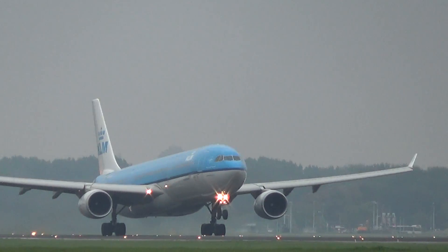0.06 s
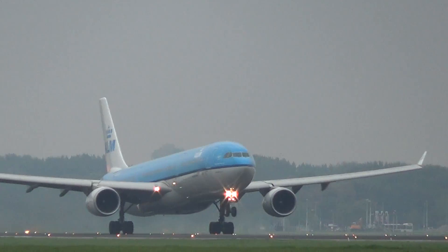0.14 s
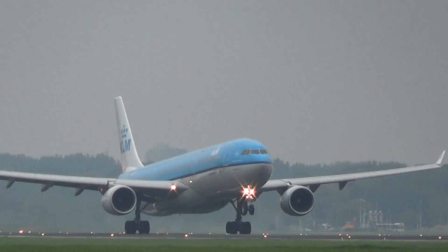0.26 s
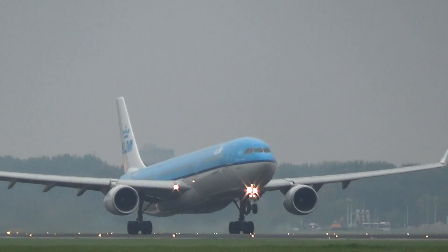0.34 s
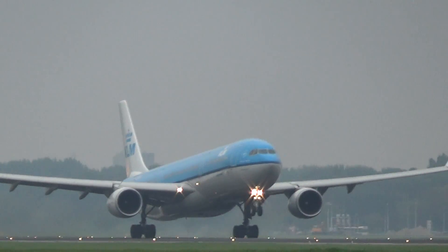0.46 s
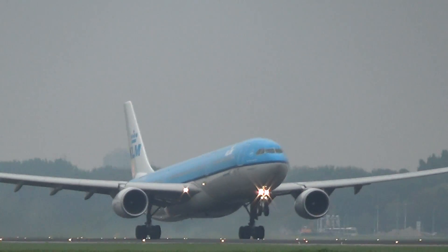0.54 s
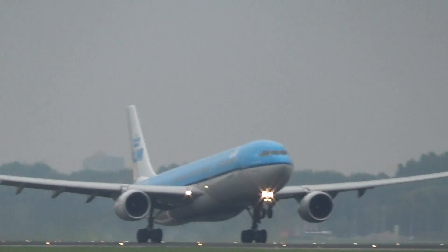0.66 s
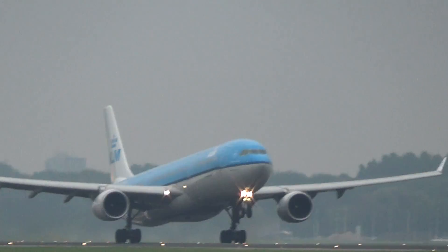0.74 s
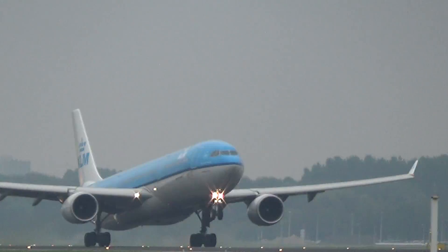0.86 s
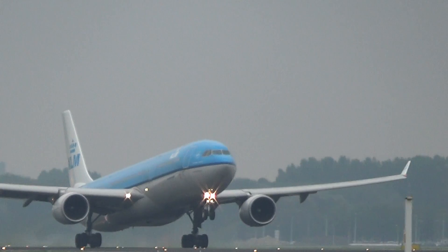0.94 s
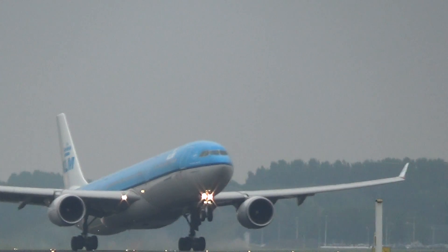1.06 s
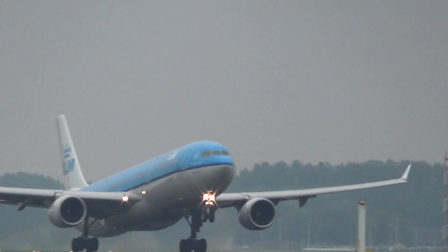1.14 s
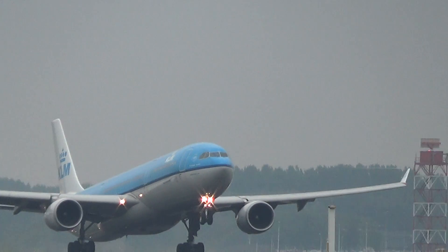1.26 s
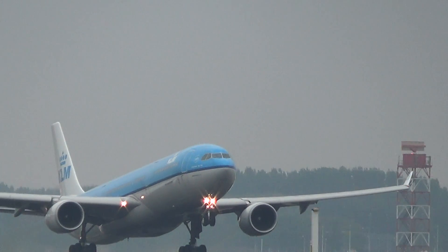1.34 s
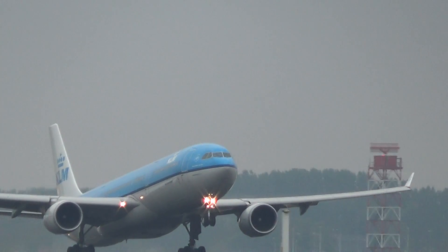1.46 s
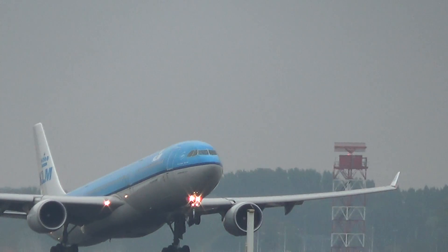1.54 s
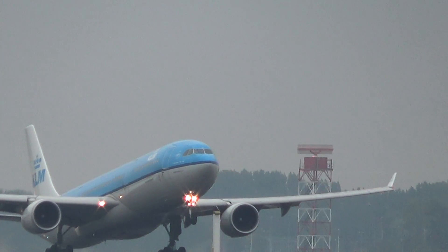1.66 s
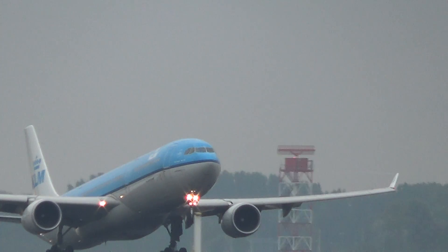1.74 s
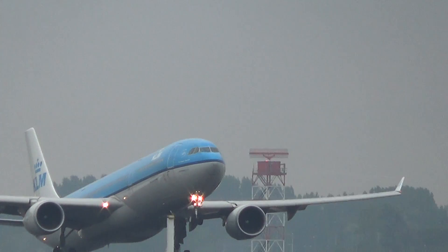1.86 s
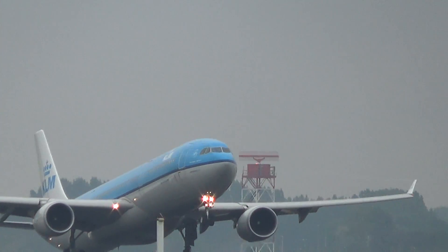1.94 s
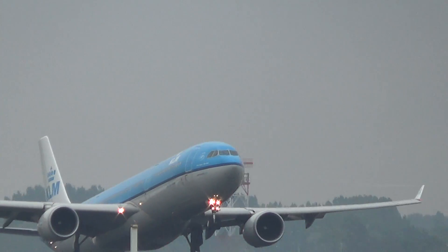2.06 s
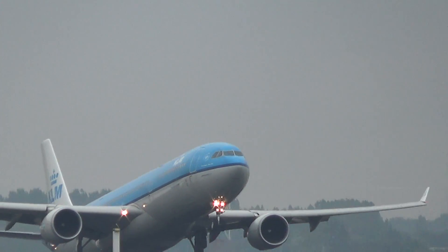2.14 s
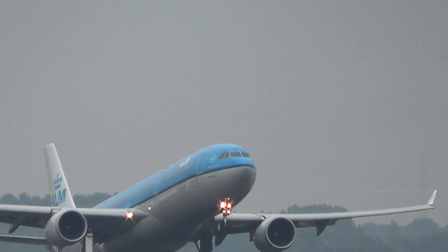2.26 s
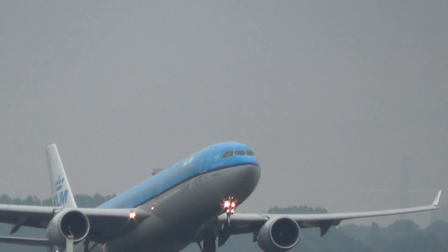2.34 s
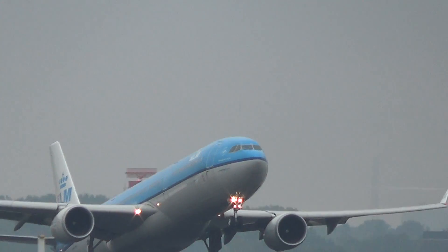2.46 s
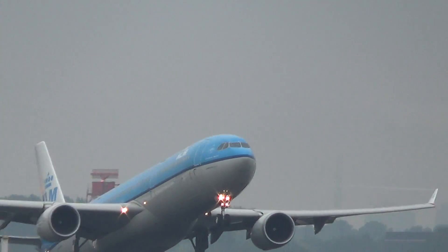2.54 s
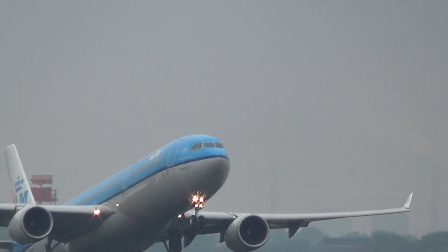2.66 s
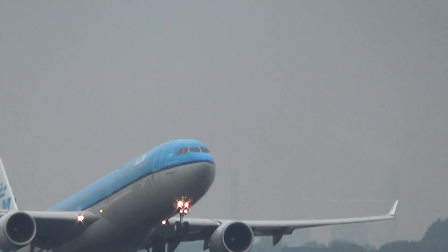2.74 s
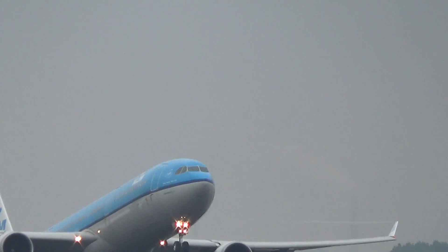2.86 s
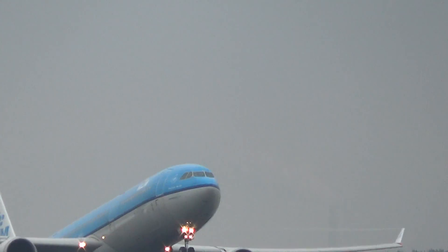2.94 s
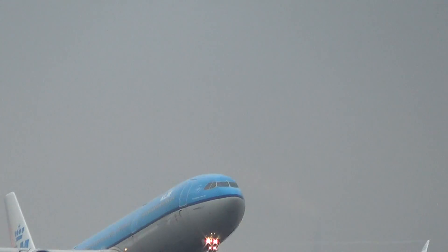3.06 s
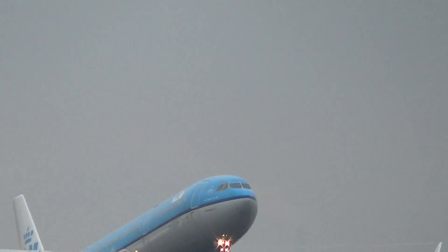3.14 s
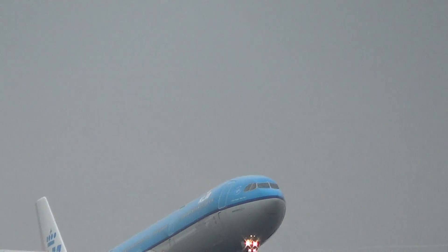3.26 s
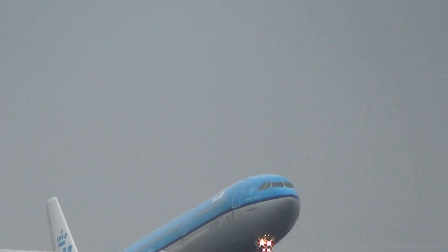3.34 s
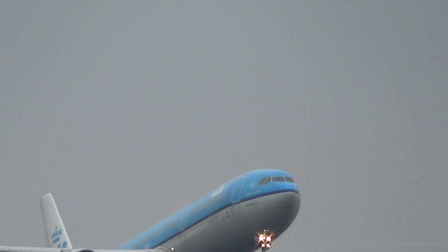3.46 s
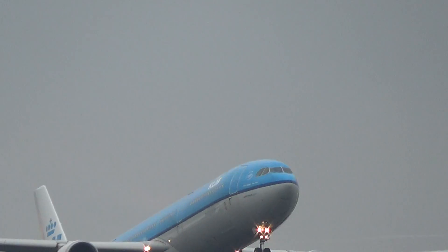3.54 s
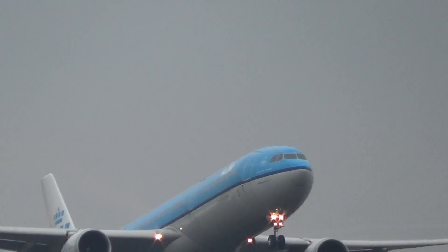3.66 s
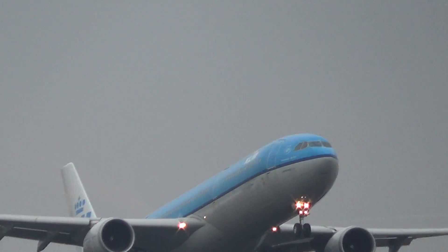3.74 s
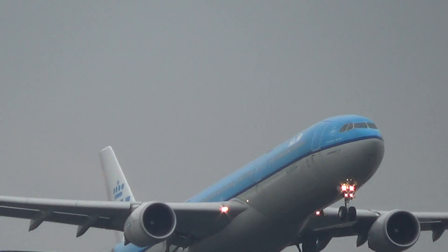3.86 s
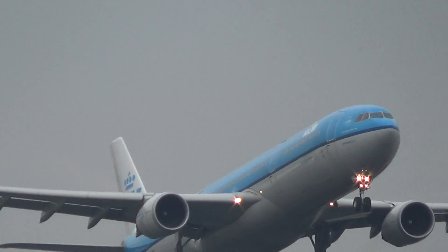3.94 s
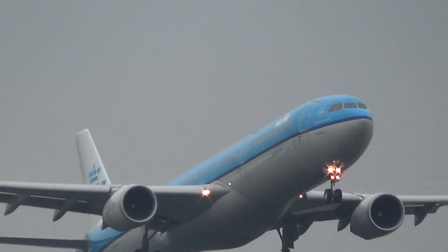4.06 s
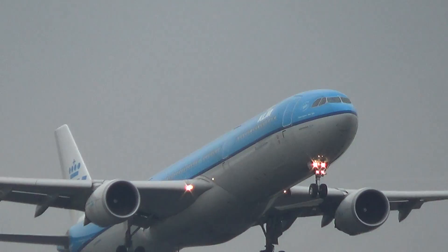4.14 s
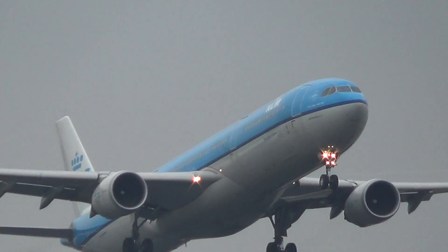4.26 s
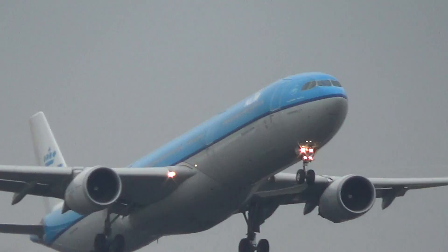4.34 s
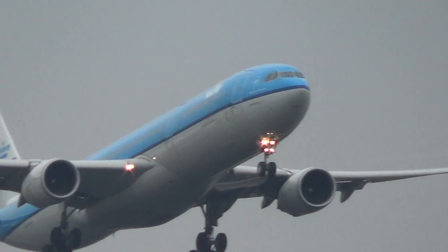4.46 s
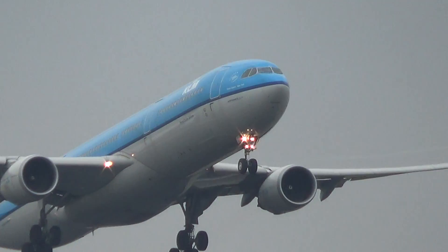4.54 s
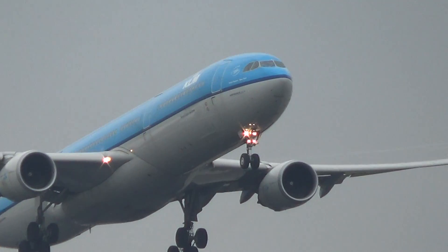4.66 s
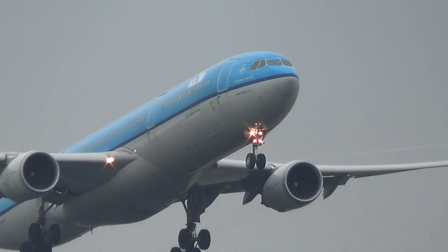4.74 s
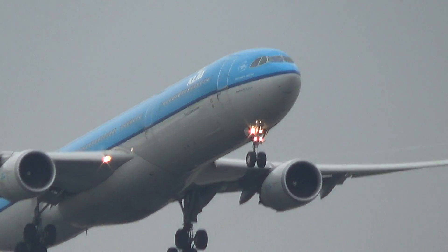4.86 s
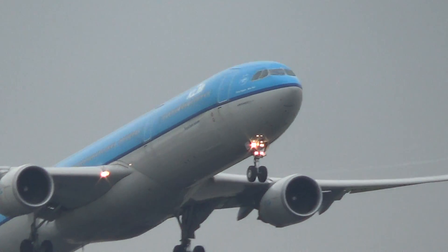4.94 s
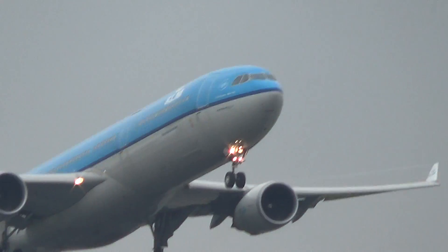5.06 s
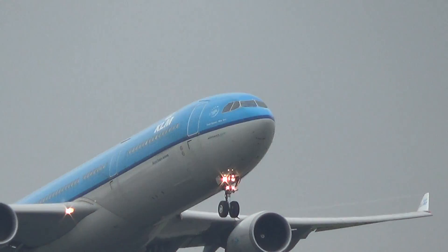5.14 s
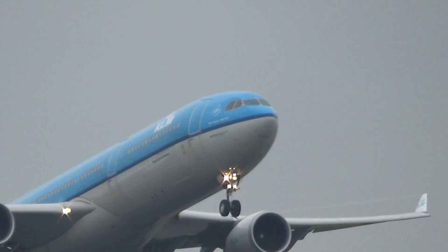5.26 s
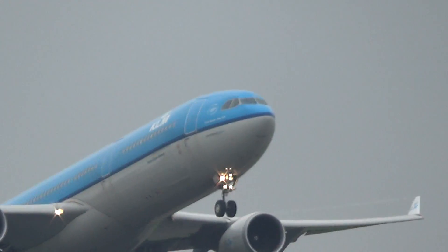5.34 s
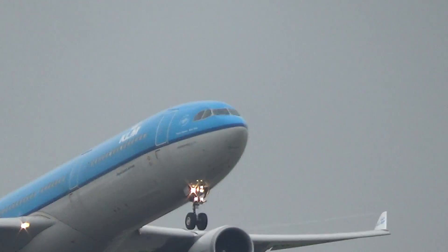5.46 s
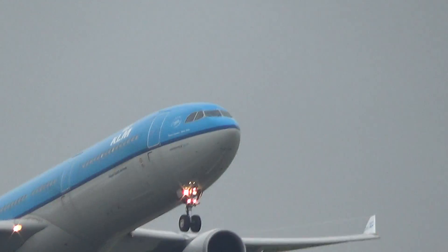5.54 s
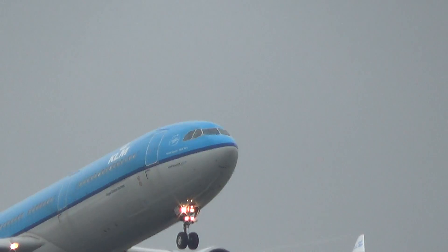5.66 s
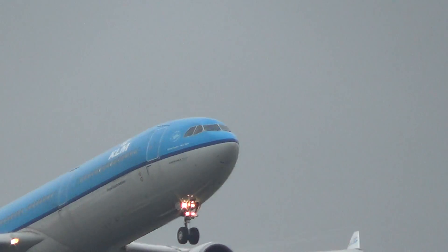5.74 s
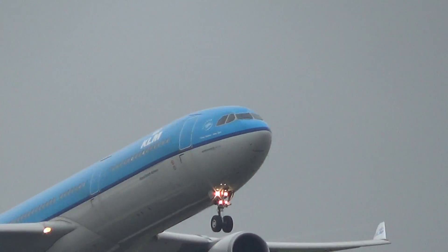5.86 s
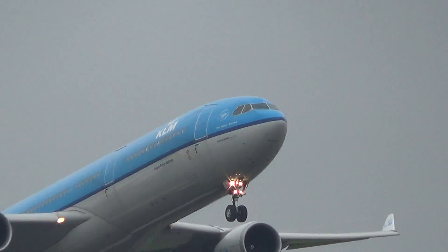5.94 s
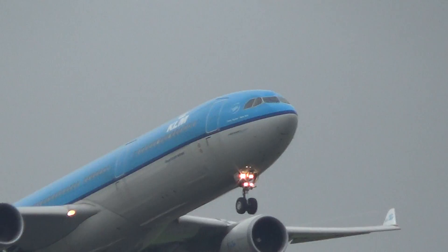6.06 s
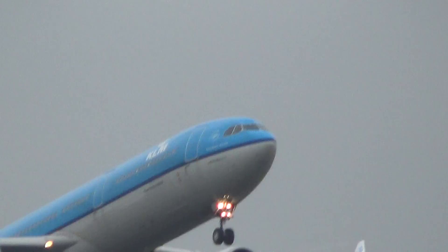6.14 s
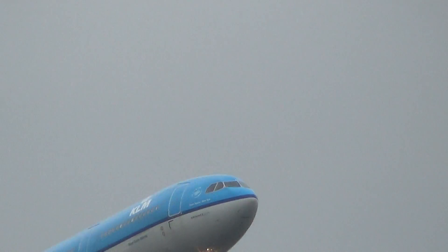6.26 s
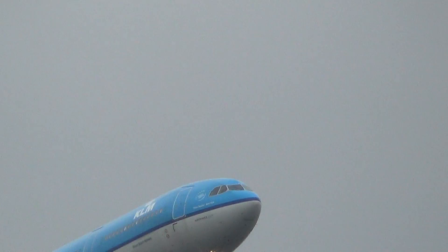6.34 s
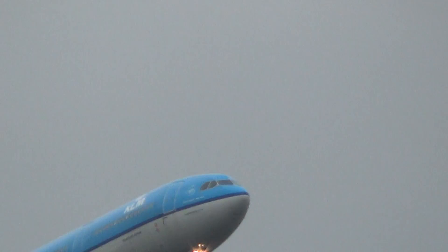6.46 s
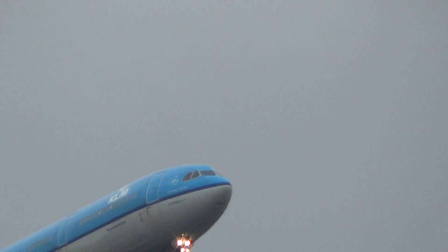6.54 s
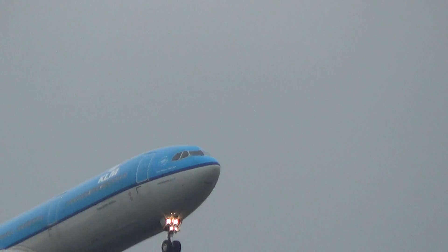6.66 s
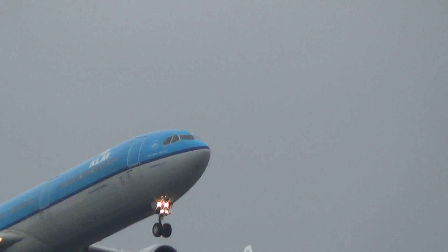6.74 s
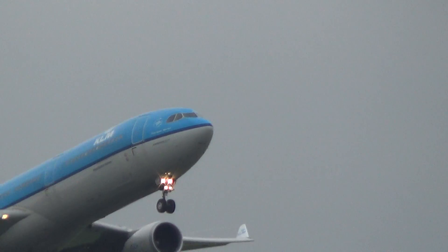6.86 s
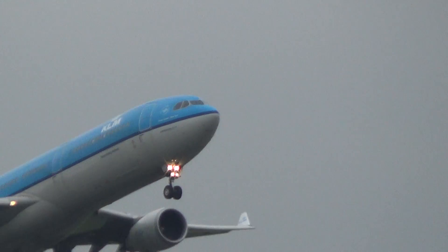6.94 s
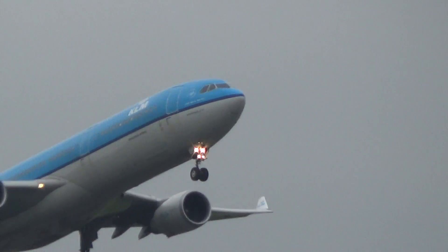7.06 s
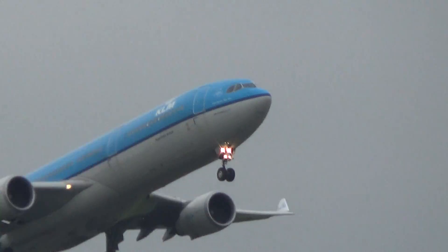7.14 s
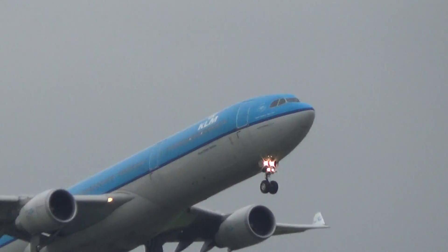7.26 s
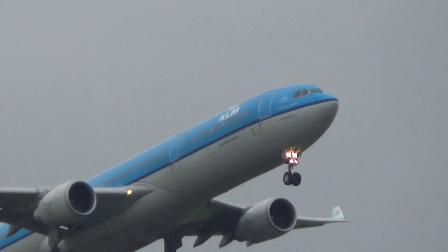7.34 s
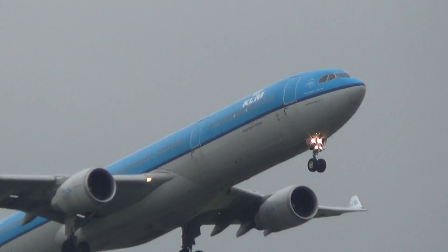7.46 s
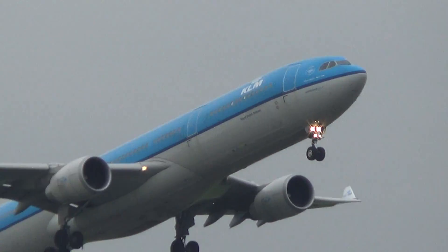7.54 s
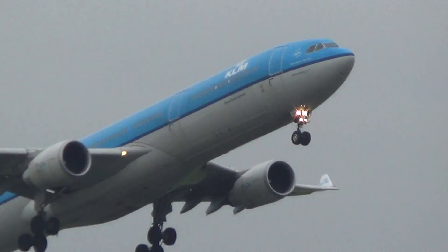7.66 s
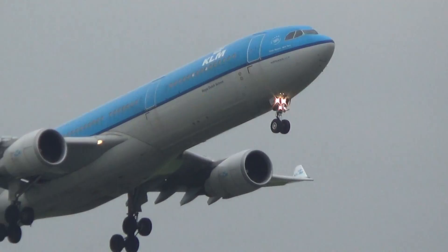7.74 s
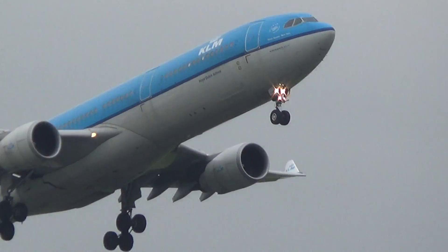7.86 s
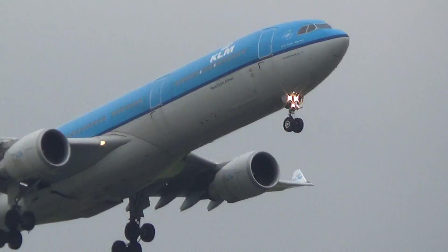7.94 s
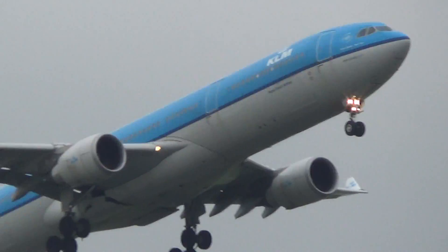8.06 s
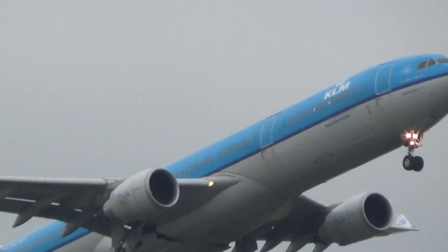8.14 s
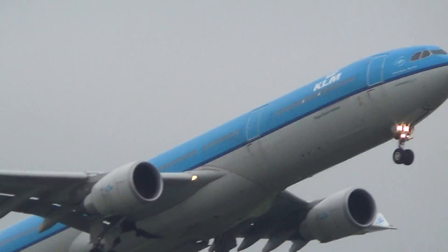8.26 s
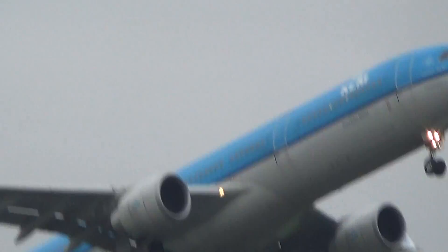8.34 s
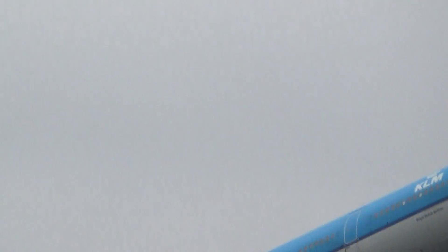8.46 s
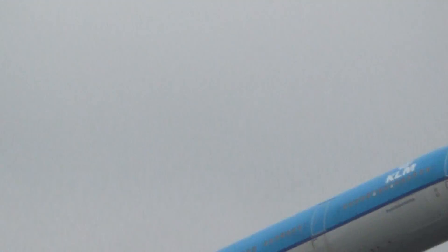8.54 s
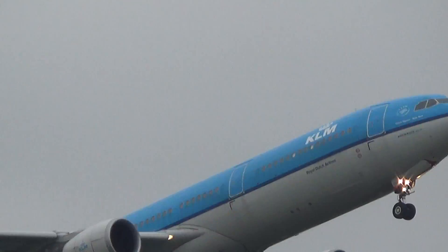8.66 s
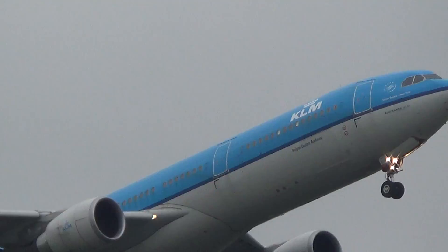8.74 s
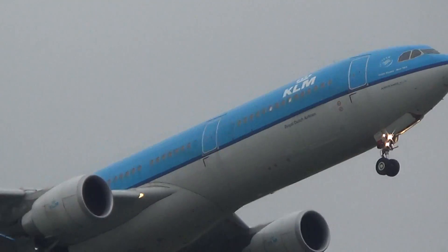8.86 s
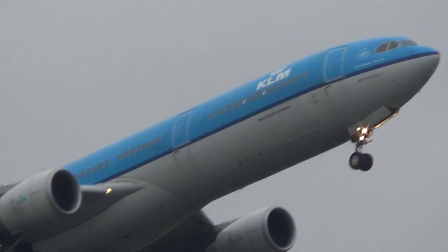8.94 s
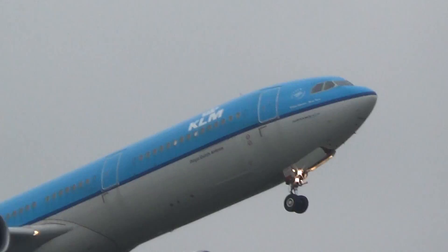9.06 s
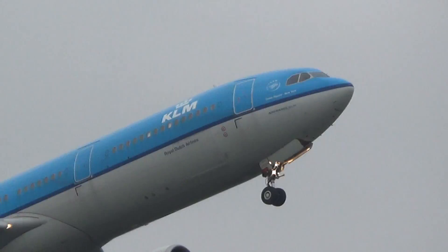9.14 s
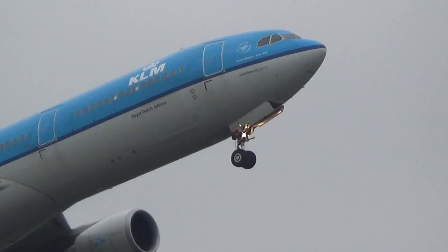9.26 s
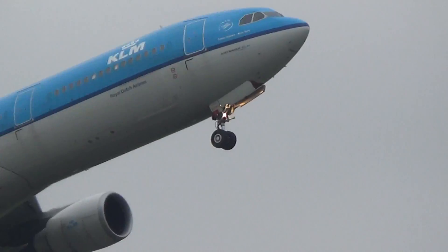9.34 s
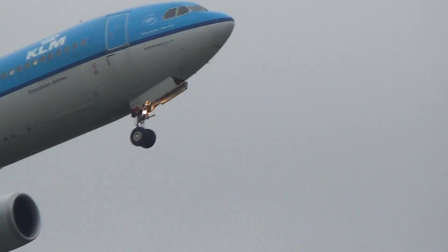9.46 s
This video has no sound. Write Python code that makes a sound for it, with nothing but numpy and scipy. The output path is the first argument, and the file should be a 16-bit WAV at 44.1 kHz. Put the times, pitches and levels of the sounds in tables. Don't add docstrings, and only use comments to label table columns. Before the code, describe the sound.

Breezy airfield with faint jet hiss and gusty microphone rumble, then an approaching airliner's roar swells close, with a piercing fan whine sliding down.

```python
import sys
import numpy as np
from scipy import signal
from scipy.fft import rfft, irfft, next_fast_len
from scipy.io import wavfile

SR = 44100
rng = np.random.default_rng(int(sys.argv[2]) if len(sys.argv) > 2 else 0)


def to_linear_factor(level_db):
    exponent = np.asarray(level_db, float) / 20
    return 10 ** exponent


def dump_mix(stems):
    frames = np.atleast_2d(stems).T
    limited = np.clip(frames, -1, 1)
    pcm = np.round(limited * 32767).astype(np.int16)
    wavfile.write(sys.argv[1], SR, pcm)


N = 418509
SIZE = next_fast_len(N)
HZ = np.maximum(np.arange(SIZE // 2 + 1) * SR / SIZE, 1)
STEP = 16
SLOW_S = np.arange(N // STEP + 2) * STEP / SR

START_M, END_M, NEAR_M = 700, 150, 266
CLOSING_BEND = 1.72
AIR_DB_PER_M = 0.0187


def rms_one(x):
    return x / np.sqrt(np.mean(x ** 2) + 1e-20)


def full(slow):
    return np.interp(np.arange(N) / SR, SLOW_S, slow)


def in_time(rows):
    s, *columns = np.transpose(rows)
    return [np.interp(SLOW_S, s, column) for column in columns]


def at_hz(points, hz):
    table_hz, table_db = np.transpose(points)
    return np.interp(np.log(hz), np.log(table_hz), table_db)


def bumps(rows):
    return sum(db * np.exp(-((SLOW_S - s) / width) ** 2) for s, db, width in rows)


def plateau(start, length, edge):
    inside_s = np.minimum(SLOW_S - start, start + length - SLOW_S)
    return np.clip(inside_s / edge + .5, 0, 1)


def drift(rate):
    r = np.exp(-2 * np.pi * STEP * rate / SR)
    settle = 5000
    chance = rng.standard_normal(len(SLOW_S) + settle)
    return rms_one(signal.lfilter([1], [1, -2 * r, r * r], chance)[settle:])


def noise(colour_db, lo_hz, hi_hz, channels=1):
    gain = to_linear_factor(colour_db)
    between = (HZ > lo_hz) & (HZ < hi_hz)
    gain = gain / np.sqrt(np.sum(gain[between] ** 2) / len(HZ))
    return gain * rfft(rng.standard_normal((channels, SIZE)))


def bands(spectrum, centres):
    place = np.interp(np.log(HZ), np.log(centres), np.arange(len(centres)))
    for k, hz in enumerate(centres):
        share = np.clip(1 - np.abs(place - k), 0, 1)
        yield hz, irfft(spectrum * share, SIZE)[..., :N]


def shimmering(hz, level_db, shimmer, width_hz):
    share, gain = np.clip(shimmer, 0, 1), np.sqrt(2) * to_linear_factor(level_db)
    along = gain * (np.sqrt(1 - share) + np.sqrt(share / 2) * drift(width_hz))
    across = gain * np.sqrt(share / 2) * drift(width_hz)
    phase = 2 * np.pi * np.cumsum(full(hz)) / SR
    return full(along) * np.cos(phase) + full(across) * np.sin(phase)


def beyond_m():
    travelled = (SLOW_S * SR / N) ** CLOSING_BEND
    return START_M - NEAR_M - (START_M - END_M) * travelled


# start_s, level_db
APPROACH = [(0, -40.5), (1.2, -38.5), (2.0, -39.5), (2.8, -38), (4.4, -36), (5.2, -33.5), (6.0, -30),
            (6.4, -29), (6.55, -24), (6.68, -25.5), (7.03, -23.5), (7.3, -18.5), (7.65, -19.5), (7.85, -22),
            (8.0, -18.5), (8.5, -21), (9.0, -19.5), (9.49, -20)]


def approach_db():
    return in_time(APPROACH)[0]


# pitch_hz, width_hz, level_db
IDLING_WHINES = [
    (1775, 40, -59),
    (2080, 15, -62),
]
# start_s, length_s, pitch_hz, rise_hz_per_s, level_db
SHRILL_WHINES = [
    (.1, .4, 3180, 550, -61),
    (2.35, .42, 3200, 0, -56),
]
# pitch_hz, level_db
AIRFIELD_HISS = [(1500, -20), (2800, 0), (4000, -3), (5200, -9), (7000, -13), (11000, -24)]


def far_airfield(hiss_db=-63.5):
    whines = 0
    for hz, width, db in IDLING_WHINES:
        whines = whines + shimmering(np.full(len(SLOW_S), hz), db + 3 * drift(0.73), 0.89, width)
    for s, length, hz, rise, db in SHRILL_WHINES:
        swell_db = db + 3 - 40 * (1 - plateau(s - .1, length + .2, .3))
        whine = shimmering(hz + rise * (SLOW_S - s), swell_db, .8, width_hz=35)
        whines = whines + whine * full(plateau(s - .2, length + .4, .1))
    hiss = irfft(noise(at_hz(AIRFIELD_HISS, HZ), 2800, 5200, channels=2), SIZE)[:, :N]
    return whines * [[.7], [1]] + to_linear_factor(hiss_db) * hiss


# pitch_hz, level_db
PREAMP_HISS = [(300, -30), (1000, 4), (6000, 3), (9000, 1.5), (12000, 0.2), (16000, -1.5)]


def electronics(whistle_db=-63, hiss_db=-68, line_hz=15625, field_hz=50):
    sink_db = -0.26 * np.maximum(approach_db() + 30, 0)
    late = np.maximum(SLOW_S - 8.1, 0)
    whistle_db = whistle_db + sink_db - 11 * late
    hiss_db = hiss_db + 0.55 * sink_db - 4.5 * late
    t = np.arange(N) / SR
    from_gap = np.abs((t - .0112 + .5 / field_hz) % (1 / field_hz) - .5 / field_hz)
    gate = np.clip((from_gap - .0018) / .001, .05, 1)
    whistle = gate * np.sin(2 * np.pi * line_hz * t)
    hiss = irfft(noise(at_hz(PREAMP_HISS, HZ), 13100, 17900)[0], SIZE)[:N]
    return full(to_linear_factor(whistle_db + 4.5)) * whistle + full(to_linear_factor(hiss_db + .8)) * hiss


# start_s, peak_db, top_hz
BODY_TICKS = [(0.0983, -48, 8000), (0.353, -51, 8000), (0.4262, -50, 8000), (0.8068, -53, 8000),
              (3.636, -36.5, 9400), (4.0430, -32.5, 9000), (4.0712, -45, 7000), (5.8230, -45, 9200),
              (6.816, -56, 11900), (6.8494, -54, 8950), (7.579, -48.5, 12000)]


def ticks(decay_s=.0018, body_hz=4400, body_db=-7):
    out, length = np.zeros(N), 600
    t = np.arange(length) / SR
    shell = to_linear_factor(body_db) * np.sin(2 * np.pi * body_hz * t)
    for s, db, top_hz in BODY_TICKS:
        band = signal.butter(2, [3400, top_hz], "band", fs=SR, output="sos")
        crack = signal.sosfilt(band, rng.standard_normal(length))
        start = round(s * SR)
        out[start:start + length] = to_linear_factor(db + 7.5) * np.exp(-t / decay_s) * (crack + shell)
    return out


# start_s, buffet_db, brightness_db_per_octave
WIND = [(0, -35.5, 0.5), (1.2, -31.5, 1.5), (2.35, -30, 0.5), (2.55, -23, -1.5), (2.95, -23, -1.5),
        (3.2, -28, 1), (4.7, -29, 0.5), (5.5, -31, 0), (5.95, -21, -0.5), (6.4, -22, 0.5), (6.95, -21.5, 4),
        (6.97, -27, -1), (7.85, -20.5, 0), (8.2, -26, 1), (8.8, -23.5, 1), (9.49, -32, 4)]
# middle_s, level_db, half_width_s
GUSTS = [(0, 9, 0.02), (.2, -4, 0.03), (.31, 11.5, 0.029), (.52, -3, 0.11), (.67, 7, 0.056),
         (.82, -4, 0.072), (.89, 4.5, .04), (.95, -3, .04), (1.47, 4, .07), (1.73, 2.5, 0.1),
         (1.86, -3, 0.053), (2.24, 4, 0.036), (2.32, -1.5, .05), (2.6, 3.5, 0.038), (2.74, 3.5, 0.036),
         (2.81, -7, 0.025), (3.04, -7.5, 0.051), (3.16, 3.5, .06), (3.76, -1.5, .06), (4.02, 0.5, 0.064),
         (4.63, 4, 0.083), (4.79, -2.5, .05), (4.88, 3.5, 0.042), (5.84, 2.5, 0.031), (5.99, -0.5, 0.018),
         (7.39, -4, 0.055), (8.56, 4.5, 0.041), (8.64, -3.5, 0.033), (9.14, -3.5, .07), (9.27, 6.5, 0.035)]
# pitch_hz, level_db
BUFFET = [(25, -30), (50, -17), (100, -3), (180, 0), (300, -2), (500, -8), (900, -18), (1600, -29),
          (2300, -44), (6000, -100)]
# pitch_hz, level_db
PORT_SIDE = [(60, -15.5), (170, -7), (340, -2.5), (520, 0.5), (1200, -2.6), (3000, 19.5)]


def wind(lumpy_db=1.5, unrelated_db=-9, dulling=0.25):
    mean_db, bright_db = in_time(WIND)
    gust_db = bumps(GUSTS)
    bright_db = bright_db - dulling * gust_db
    one, other = noise(at_hz(BUFFET, HZ), 62, 420, channels=2)
    side = 1j * one + to_linear_factor(unrelated_db) * (1 + 90 / HZ) * other - 9 / HZ * one
    side = side * to_linear_factor(at_hz(PORT_SIDE, HZ))
    lumps_db = mean_db + gust_db - 1.5 + lumpy_db * drift(25.0)
    out = 0
    for hz, part in bands(np.array([one, side]), np.geomspace(100, 1600, 5)):
        octaves = np.log2(hz / 250)
        tilt_db = bright_db * max(octaves, 0.51 * octaves)
        out = out + part * full(to_linear_factor(lumps_db + tilt_db + 0.99 * drift(15.0)))
    return out


# start_s, length_s, level_db
DIPS = [
    (5.96, .1, -2),
    (6.783, .19, -4.5),
]


def dip_db():
    return sum(db * plateau(s, length, 0.013) for s, length, db in DIPS)


def crackle(per_s=60, near_db=-44.5, db_per_m=.045, low_hz=7000, spread_db=3.5):
    born = rng.random(N) < per_s / SR
    sizes = to_linear_factor(spread_db * np.minimum(rng.exponential(1, N), 4)) * rng.choice([-1, 1], N)
    far_m = beyond_m()
    level = full(to_linear_factor(near_db - db_per_m * (2 * np.maximum(far_m, 0) + far_m)))
    highpass = signal.butter(2, low_hz, "high", fs=SR, output="sos")
    return signal.sosfilt(highpass, born * sizes * level + 1e-18)


# start_s, pitch_hz, level_db (against the roar)
FAN = [(0, 2478, -13), (1, 2498, -10.5), (3, 2532, -13.5), (5, 2555, -8.5), (6.9, 2546, -7.5),
       (7.25, 2531, -4), (8.05, 2506, -9), (8.6, 2475, 0), (9.49, 2435, -0.5)]
# multiple_of_pitch, level_db (against the tone)
OVERTONES = [
    (2, -25),
    (3, -47),
]
# start_s, length_s, level_db
ROTOR_BEAMS = [
    (7.1, .2, 14.5),
    (8.5, 1.2, 8.5),
]


def fans(far_shimmer=1.1, near_shimmer=.3, waver_hz=9):
    hz, beam_db = in_time(FAN)
    shimmer = far_shimmer + (near_shimmer - far_shimmer) * plateau(8.5, 10, .3)
    hz = hz + waver_hz * shimmer * drift(4)
    roar_db, farness_db = approach_db(), -AIR_DB_PER_M * beyond_m()
    tone_db = roar_db + beam_db
    out = shimmering(hz, tone_db + 1, .8 * shimmer, width_hz=26)
    out += shimmering(hz - 55, tone_db - 10.5, 1, width_hz=45)
    for k, db in OVERTONES:
        out += shimmering(k * hz, tone_db + db + 1.3 * k * farness_db, 0.91, width_hz=45 * k)
    rotor_hz = 1588 - 25 * SLOW_S
    rotor_db = roar_db - 18.5 + sum(db * plateau(s, length, 0.11) for s, length, db in ROTOR_BEAMS)
    return out + shimmering(rotor_hz, rotor_db + farness_db, .5, width_hz=10)


# pitch_hz, level_db
ROAR = [(35, -56), (60, -27), (141, -14), (250, -27), (314, -16), (724, -3), (1110, -3.5), (2030, -7.5),
        (2670, -10.5), (4880, -23), (6280, -38.5), (8160, -55), (10500, -62), (14000, -94)]
# pitch_hz, width_hz, level_db
HOUSING = [(945.5, 95, -8), (1130, 190, 0), (1355, 113, 0), (2450, 67, 5), (4240, 300, -2.5),
           (5400, 320, -3), (6750, 300, -5.5), (7400, 300, 0)]
# middle_s, level_db, half_width_s
GROUND = [(.8, -1, 0.19), (5.2, -0.5, 0.1), (6.5, -4, 0.17), (7.1, -1, .1), (7.48, -5, 0.22),
          (7.85, 2, 0.076), (8.3, 6, 0.17), (8.9, -3.5, 0.26), (9.4, 3.5, 0.13)]
# middle_s, level_db (at 4 kHz),
# half_width_s
CLEAR_AIR = [(.35, -0.5, 0.11), (.8, -4, 0.18), (2.5, 3, .2), (6.65, 2, 0.11), (7.2, -1, 0.2),
             (7.7, 2.5, 0.16), (8.5, 2, 0.28)]


def roar(patchy_db=1.47, surge_db=1.0, body_top_hz=1110, body_slope_oct=.8):
    level_db, far_m = approach_db(), beyond_m()
    body_db = 0.0071 * far_m + bumps(GROUND)
    colour = at_hz(ROAR, HZ)
    for hz, width, db in HOUSING:
        colour = colour + db * np.exp(-((HZ - hz) / width) ** 2)
    farness_db = surge_db * drift(11.0) + bumps(CLEAR_AIR) - AIR_DB_PER_M * far_m
    top_db = -.06 * far_m
    out = 0
    for hz, part in bands(noise(colour, 1050, 2300)[0], np.geomspace(200, 10000, 15)):
        loss = max(hz - 1600, 0) / (3800 - 1600)
        air_db = farness_db * min(loss, 1.5) + top_db * np.clip(loss - 1.5, 0, 1)
        body_share = np.clip(.5 - np.log2(hz / body_top_hz) / body_slope_oct, 0, 1)
        out = out + part * full(to_linear_factor(level_db + air_db + body_db * body_share + patchy_db * drift(3.3)))
    return out


def scene(echo_db=-24, echo_s=.07, wetter=.8):
    direct = roar()
    echo_gain = full(to_linear_factor(echo_db + wetter * AIR_DB_PER_M * beyond_m()))
    echo = echo_gain * np.interp(np.arange(N) - echo_s * SR, np.arange(N), direct, left=0)
    pan_db = 1.6 + .14 * SLOW_S + .48 * np.maximum(SLOW_S - 5.5, 0)
    pan = full(to_linear_factor(pan_db / 2))
    aircraft = (direct + fans() + crackle()) * np.array([pan, 1 / pan]) * 2 / (pan + 1 / pan)
    mid, side = wind()
    ducked = full(to_linear_factor(dip_db())) * (aircraft + electronics() + echo * [[1], [-1]])
    return ducked + far_airfield() + mid + ticks() * [[1.15], [.85]] + side * [[1], [-1]]


def roll_off(x):
    return signal.sosfilt(signal.butter(12, 15830, fs=SR, output="sos"), x)


def record(dry):
    rounded = 1.303 * np.tanh(dry / 1.328)
    return roll_off(rounded)


dry = scene()
out = record(dry)
dump_mix(out)
```